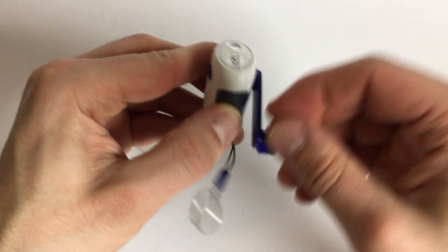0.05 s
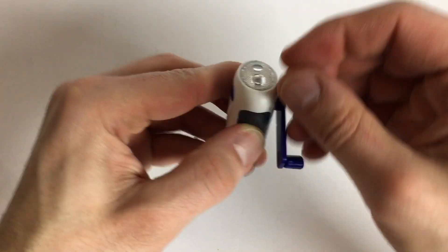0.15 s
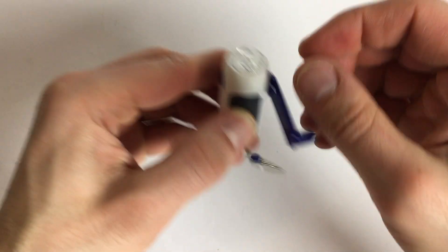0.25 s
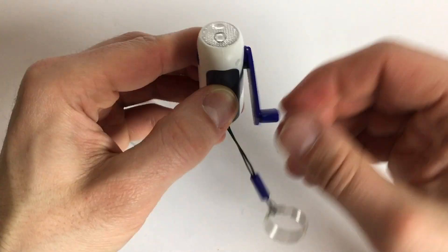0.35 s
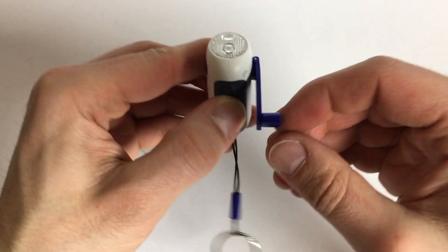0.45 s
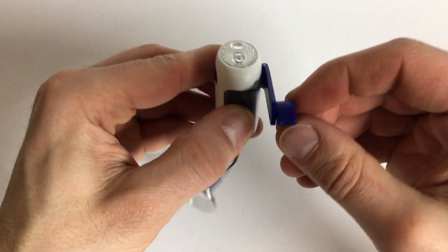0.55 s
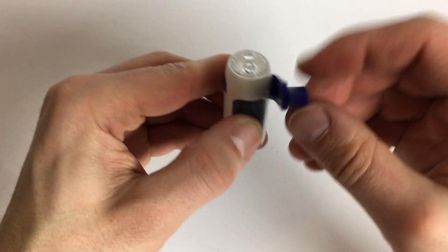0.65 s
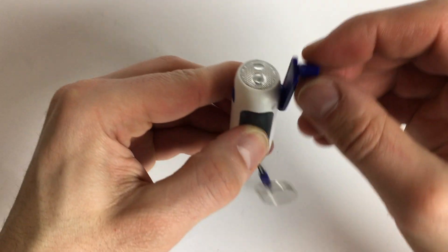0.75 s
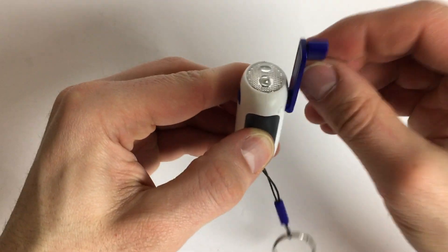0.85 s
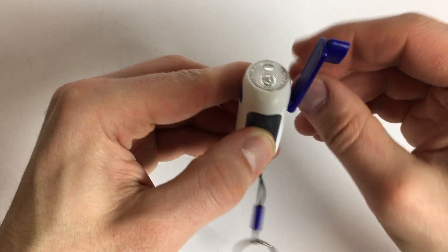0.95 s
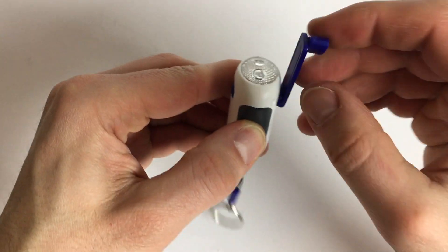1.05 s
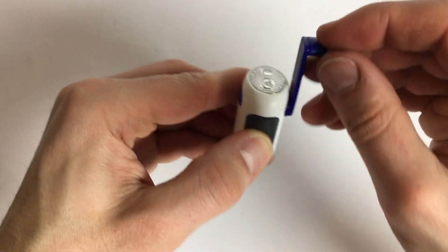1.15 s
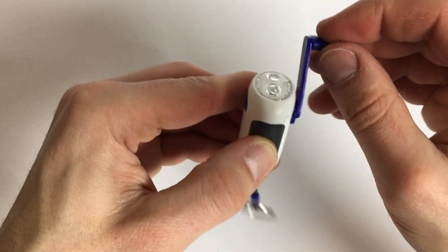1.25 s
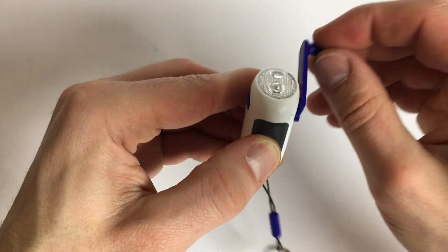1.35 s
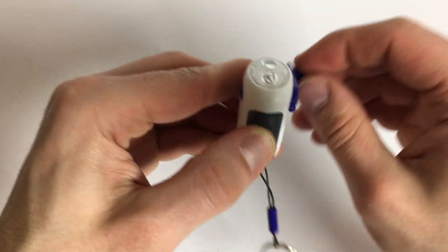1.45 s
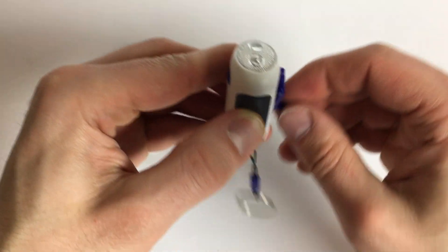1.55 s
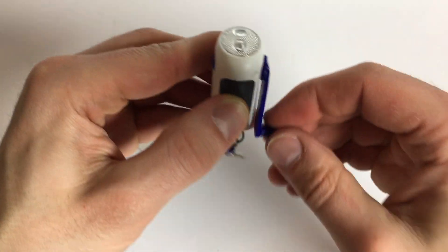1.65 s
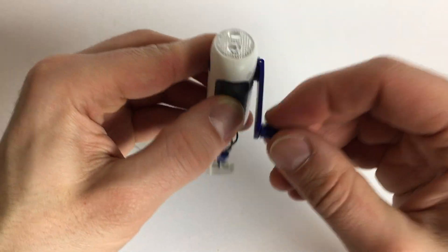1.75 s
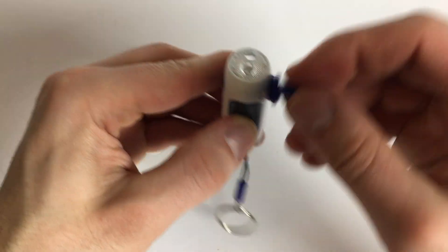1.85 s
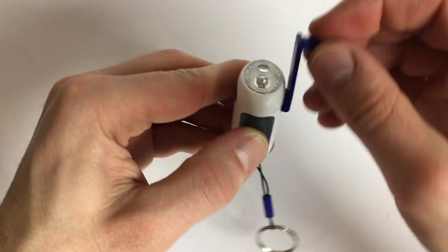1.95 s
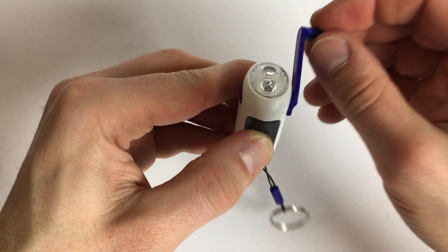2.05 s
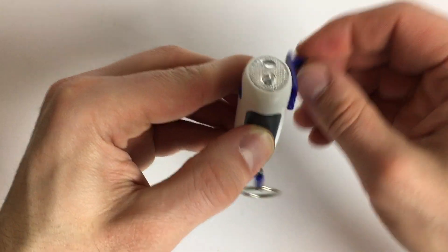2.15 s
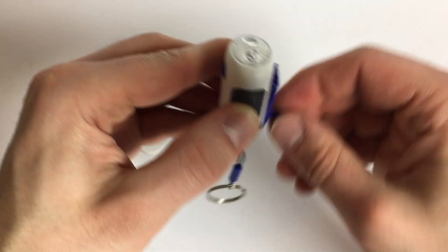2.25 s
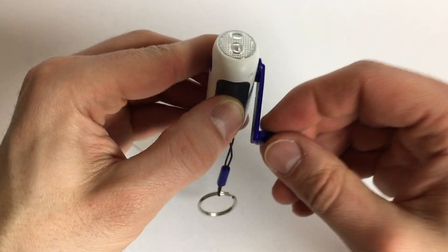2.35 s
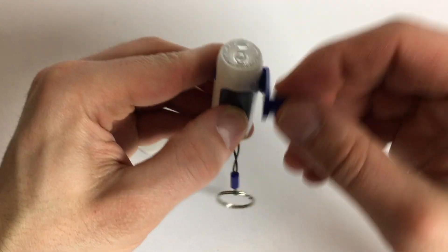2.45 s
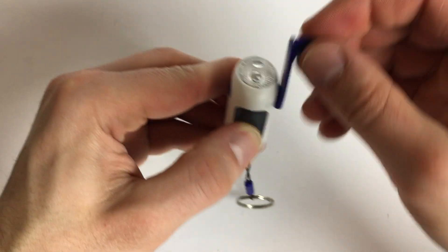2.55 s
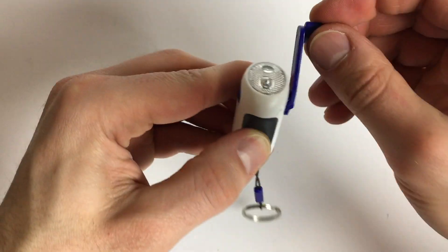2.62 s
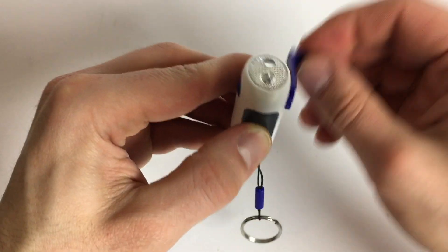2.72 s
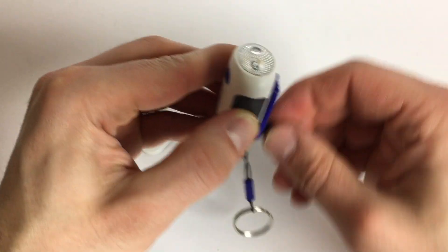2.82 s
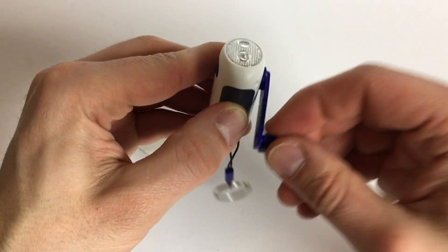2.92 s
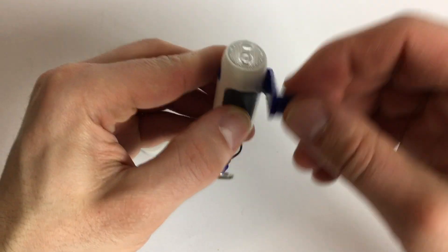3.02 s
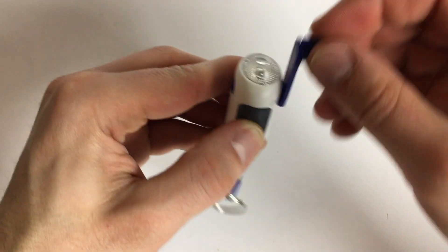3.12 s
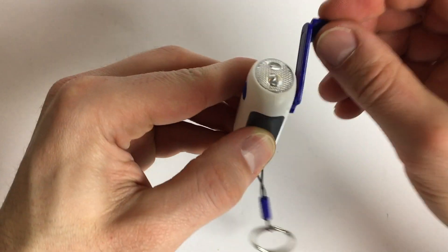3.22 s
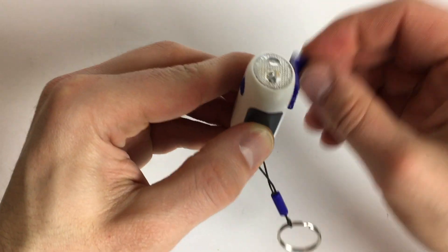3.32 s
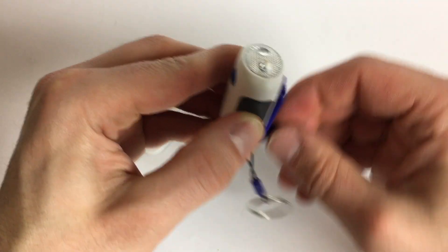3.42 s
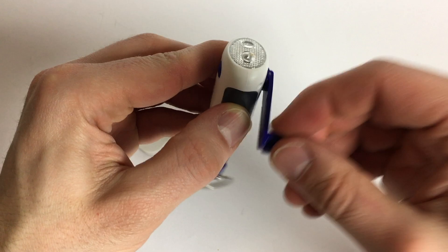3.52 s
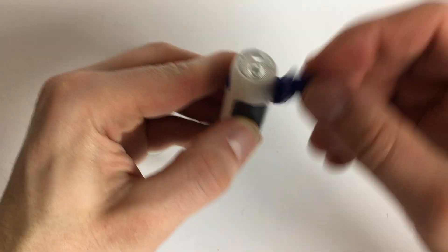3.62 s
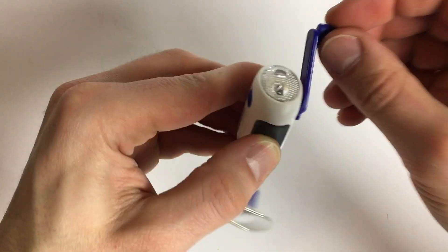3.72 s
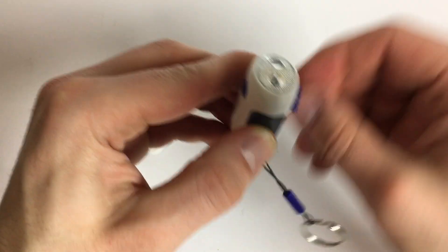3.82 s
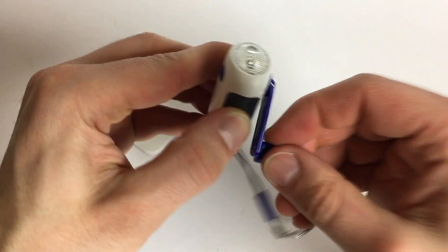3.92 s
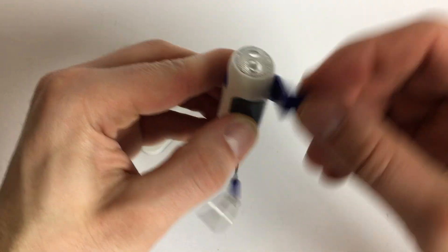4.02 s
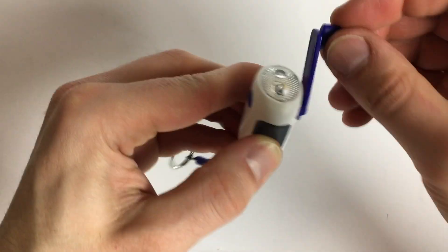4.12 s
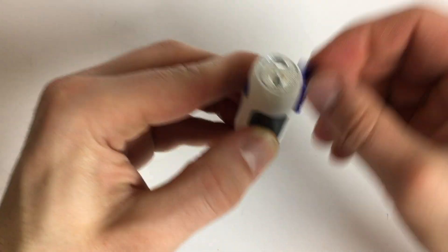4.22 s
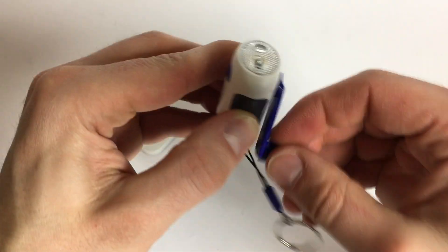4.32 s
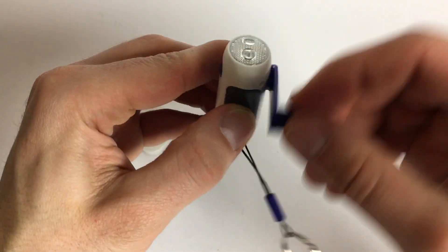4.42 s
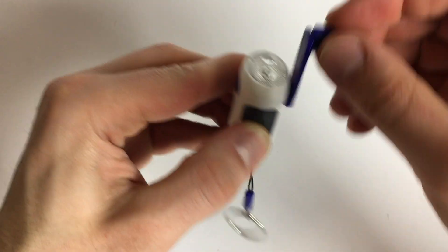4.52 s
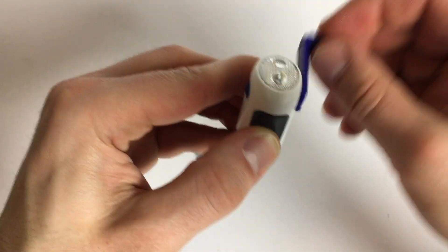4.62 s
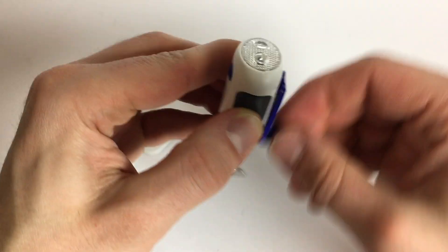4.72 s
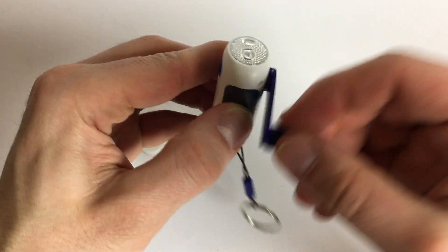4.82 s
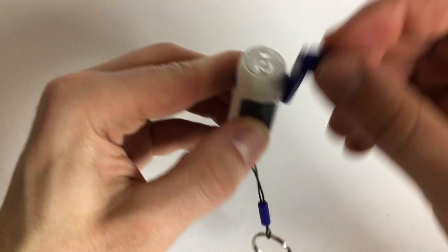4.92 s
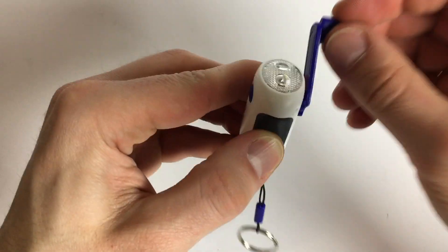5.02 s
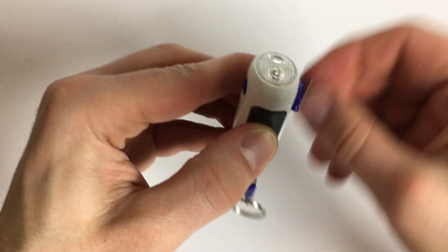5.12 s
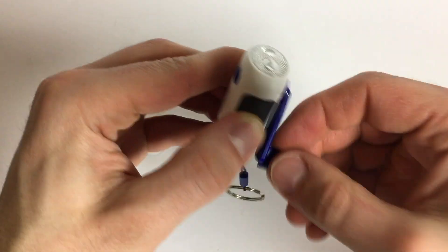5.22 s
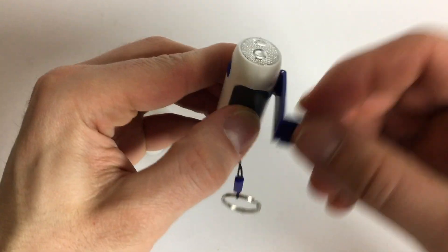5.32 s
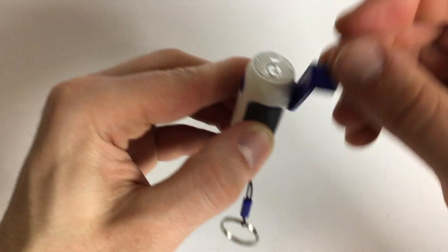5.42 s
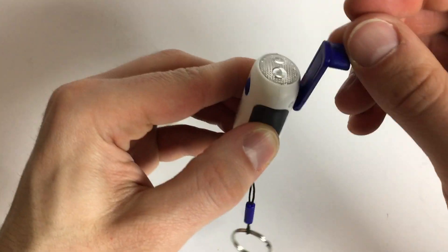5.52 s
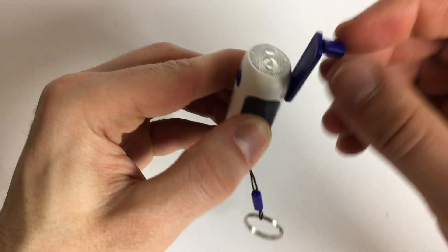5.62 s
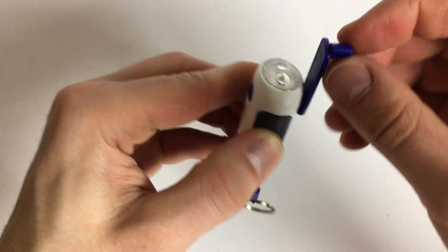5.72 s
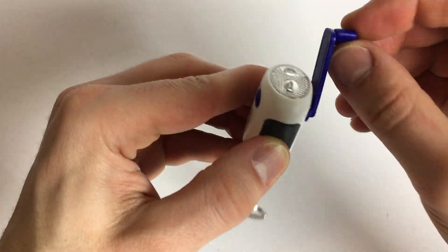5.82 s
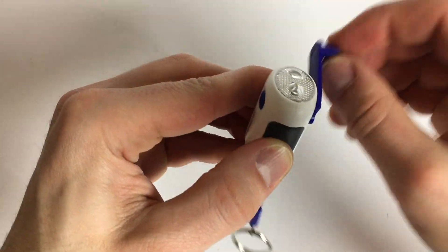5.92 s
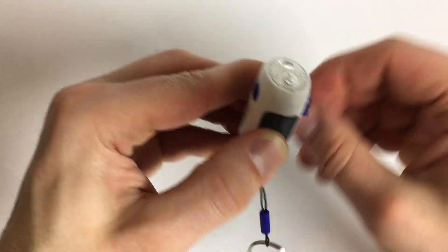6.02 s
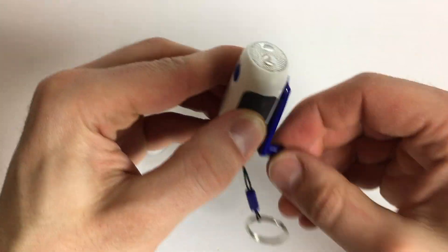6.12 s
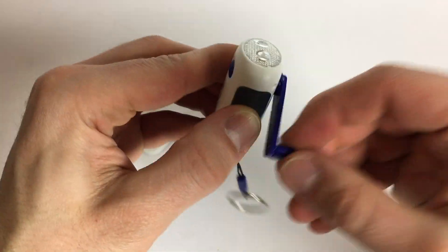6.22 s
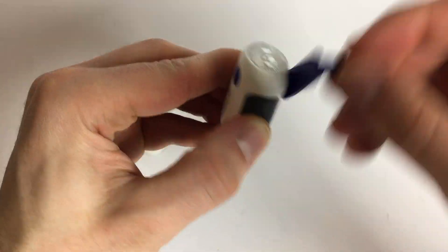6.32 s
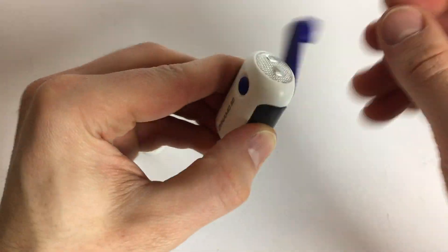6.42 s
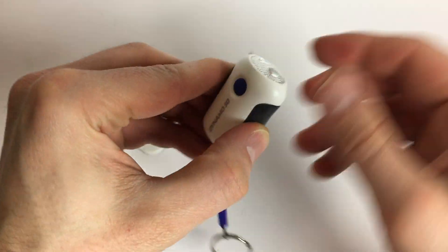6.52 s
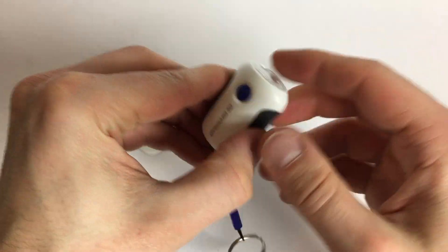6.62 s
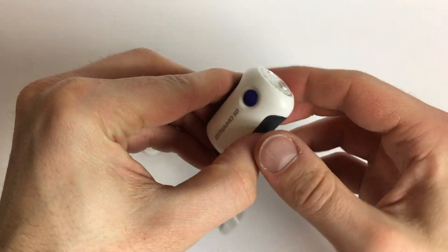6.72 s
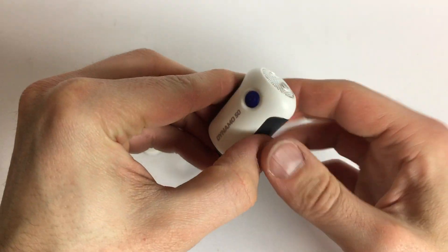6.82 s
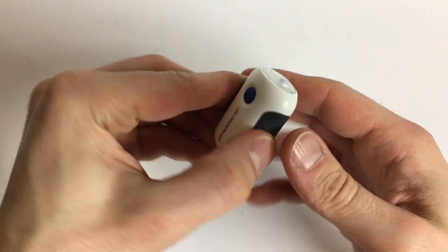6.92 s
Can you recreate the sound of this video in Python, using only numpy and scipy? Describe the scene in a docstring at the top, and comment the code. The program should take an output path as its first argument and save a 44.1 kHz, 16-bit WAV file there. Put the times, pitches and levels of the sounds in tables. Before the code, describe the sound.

Coarse plastic gear teeth clack rapidly over a rough grinding whir, with a buzzy pinion whine wavering in pitch as the crank is pushed round. The start is halting, the middle steady and vigorous, the end broken up. Sharp knocks of handle and key ring on the hollow shell stand out. The microphone is close; soft room murmur and faint rumble lie behind.

```python
"""A quiet room, the microphone close to a small plastic dynamo torch that a hand cranks in jerky strokes.
Coarse gear teeth clack in quick uneven bursts over a grind: noise blows and beating noise through the shell.
The pinion whines at its mesh rate, as sines at whole and half multiples, while it is loaded.
Single loud ticks, slow gear teeth at the start and handle and key ring on the shell, are short noise rattles;
narrow noise makes the ring shiver faintly. Behind lie room murmur, hiss, rumble, hum and two thin far tones."""
import sys
import numpy as np
from scipy import signal
from scipy.fft import rfft, irfft, next_fast_len
from scipy.io import wavfile
from scipy.ndimage import uniform_filter1d, map_coordinates

SR = 44100
rng = np.random.default_rng(int(sys.argv[2]) if len(sys.argv) > 2 else 0)


def materialize(psi):
    """Save the field psi as 16-bit PCM at rate SR to the path in sys.argv[1].

    A 1-D psi becomes a single channel; in a 2-D psi each row is a channel.
    """
    bounded = np.clip(np.atleast_2d(psi).T, -1, 1)
    quanta = np.round(bounded * 32767).astype(np.int16)
    wavfile.write(sys.argv[1], SR, quanta)


def volts(x):
    """Linear amplitude factor 10**(x/20) for a level x in dB, scalar or array-like."""
    e = np.asarray(x, float) / 20
    return 10 ** e


N = 306936

# room murmur and microphone hiss, relative spectrum: pitch_hz, level_db
AIR_COLOUR = [(15, -46), (25, -4), (97, -4), (141, -2), (293, -4), (463, -8), (531, -5.5), (677, -7),
              (775, -5), (962, -10), (1040, -10), (1440, -11.5), (16000, -12.5)]
# course of murmur and hiss before a slow random drift: time_s, level_db
AIR_LEVEL = [(0, -47), (.3, -51.5), (.5, -50), (1.65, -48), (2.44, -47), (3.3, -50.5), (4.27, -49),
             (4.8, -53), (5.1, -49.5), (5.6, -56), (6.22, -53), (6.96, -53.5)]
# swells of deep rumble: centre_s, half_length_s, level_db
RUMBLE_SWELLS = [(.09, .1, -60), (.42, .1, -66), (1.15, 0.53, -63.5), (4.5, 0.24, -72), (5.094, .1, -59),
                 (6.495, 0.11, -78)]
# swells of a faint hum: centre_s, half_length_s, level_db
HUM_SWELLS = [(0.517, 0.33, -56.5), (1.673, .12, -59), (2.48, 0.23, -61), (3.53, 0.18, -64),
              (4.5, 0.19, -77), (5.104, 0.21, -60.5), (6.238, 0.18, -62), (6.559, 0.074, -63)]
# two faint thin tones far off, before their flutter: centre_s, half_length_s, pitch_hz, level_db
FAR_TONES = [(.45, 0.12, 1220, -54), (6.519, 0.048, 1110, -58)]
# how hard the gears work, one table a stroke: time_s, clatter_db
EFFORT_STROKES = [
    [(0.0, -42), (0.028, -42), (0.044, -31.5), (0.09, -43), (0.11, -30), (0.122, -38.5), (0.22, -67)],
    [(0.32, -68), (0.338, -61), (0.368, -49), (0.38, -57), (0.468, -64), (0.51, -32), (0.524, -43),
     (0.564, -29), (0.6, -50)],
    [(0.6, -42.5), (0.69, -28.5), (0.728, -31), (0.764, -39), (0.77, -35)],
    [(0.77, -35), (0.82, -28.5), (0.888, -51), (0.898, -36), (0.906, -50), (0.924, -41), (0.934, -58),
     (0.96, -60)],
    [(1.18, -52), (1.182, -68), (1.218, -26.5), (1.244, -27.5), (1.296, -37), (1.342, -26), (1.486, -30),
     (1.586, -23.5), (1.62, -32.5)],
    [(1.62, -29), (1.626, -34.5), (1.648, -24.5), (1.678, -22), (1.826, -29.5), (1.93, -27.5),
     (1.942, -30.5), (2.032, -25), (2.08, -34)],
    [(2.08, -31.5), (2.138, -25), (2.282, -24.5), (2.344, -30.5), (2.354, -38), (2.384, -28.5),
     (2.392, -31), (2.48, -25.5), (2.56, -33.5)],
    [(2.56, -35), (2.568, -34), (2.622, -24.5), (2.656, -28), (2.75, -21), (2.792, -26), (2.812, -36.5),
     (2.866, -35), (2.88, -38)],
    [(2.88, -44), (2.912, -29), (2.97, -31.5), (3.02, -27.5), (3.098, -30.5), (3.252, -28), (3.386, -23),
     (3.434, -30), (3.44, -44)],
    [(3.44, -40), (3.478, -20.5), (3.552, -36), (3.608, -25.5), (3.666, -25.5), (3.738, -29.5),
     (3.87, -21.5), (3.884, -29), (3.96, -39)],
    [(3.96, -46.5), (4.024, -24.5), (4.102, -25), (4.154, -33), (4.24, -22), (4.284, -23.5), (4.344, -36),
     (4.358, -25.5), (4.4, -49.5)],
    [(4.4, -44), (4.43, -25), (4.514, -25.5), (4.552, -33), (4.678, -22), (4.726, -27.5), (4.748, -35.5),
     (4.804, -31.5), (4.83, -48)],
    [(4.83, -44.5), (4.906, -23), (4.95, -26.5), (5.0, -40), (5.008, -30.5), (5.154, -21.5), (5.212, -38),
     (5.224, -32.5), (5.27, -39.5)],
    [(5.27, -48), (5.284, -43), (5.302, -32.5), (5.404, -30), (5.448, -33), (5.492, -50), (5.512, -37),
     (5.554, -65), (5.6, -58)],
    [(5.76, -68), (5.774, -43), (5.788, -31.5), (5.828, -28.5), (5.848, -34), (5.902, -27.5), (5.95, -38.5)],
    [(5.95, -35), (5.996, -27), (6.086, -36), (6.106, -27.5), (6.138, -31), (6.166, -42), (6.18, -34)],
    [(6.18, -40), (6.188, -47), (6.212, -29), (6.23, -30), (6.278, -24), (6.314, -26.5), (6.368, -41),
     (6.39, -37.5)],
    [(6.39, -44), (6.4, -44), (6.46, -36.5), (6.474, -46), (6.486, -39.5), (6.508, -52), (6.532, -44.5),
     (6.554, -56), (6.62, -64.5)],
]
# pinion under load, one table a stroke, before smoothing and jitter: time_s, mesh_hz
MESH_STROKES = [
    [(.53, 1272), (.554, 1276), (.572, 1417), (.6, 1334)],
    [(.65, 1291), (.664, 1350), (.686, 1662), (.724, 1753), (.77, 1695)],
    [(.78, 1422), (.798, 1430), (.814, 1543), (.86, 1702)],
    [(1.2, 1349), (1.214, 1635), (1.238, 1904), (1.28, 2020)],
    [(1.31, 1596), (1.324, 1593), (1.362, 2138), (1.38, 2150)],
    [(1.53, 1134), (1.576, 1291), (1.61, 1224)],
    [(1.66, 1144), (1.698, 1346), (1.774, 1579), (1.848, 1548), (1.89, 1404), (1.928, 1480), (1.976, 1310),
     (2.08, 1338)],
    [(2.12, 1213), (2.176, 1559), (2.208, 1640), (2.27, 1772), (2.29, 1916)],
    [(2.42, 1340), (2.452, 1481), (2.498, 1807), (2.52, 1814)],
    [(2.56, 1650), (2.6, 1553), (2.702, 1752), (2.722, 1856), (2.764, 2233), (2.82, 2310)],
    [(3.0, 1229), (3.036, 1463), (3.06, 1640), (3.124, 1463), (3.16, 1558), (3.278, 1542), (3.348, 1739),
     (3.398, 1982), (3.43, 1942)],
    [(3.57, 1558), (3.598, 1649), (3.668, 2333), (3.702, 2445), (3.782, 2216), (3.87, 2602)],
    [(3.99, 1476), (4.012, 1555), (4.092, 2478), (4.118, 2608), (4.204, 2168), (4.234, 2299), (4.31, 3095)],
    [(4.42, 1134), (4.472, 2002), (4.524, 2454), (4.606, 2147), (4.636, 2127), (4.716, 2872), (4.73, 2890)],
    [(4.87, 1315), (4.918, 2057), (4.962, 2245), (5.034, 1851), (5.078, 1916), (5.142, 2357), (5.16, 2323)],
    [(5.215, 2110), (5.255, 1912)],
    [(5.29, 1220), (5.322, 1324), (5.412, 1423), (5.45, 1407)],
    [(5.78, 1475), (5.804, 1967), (5.828, 2423), (5.85, 2423)],
    [(5.87, 1271), (5.896, 1338), (5.92, 1462)],
    [(5.97, 1275), (6.002, 1544), (6.02, 1736), (6.04, 1796), (6.088, 1638), (6.15, 1812)],
    [(6.2, 1266), (6.216, 1395), (6.248, 1727), (6.3, 2760), (6.34, 2952)],
]
# the treble flares, mostly as a fast stroke ends: centre_s, half_length_s, lift_db
TREBLE_FLARES = [(.57, .03, 4), (0.73, 0.025, 3), (.81, .03, 0.5), (1.223, 0.026, 1), (1.551, 0.041, 4),
                 (2.794, 0.026, 3.5), (3.429, 0.026, 6), (3.668, 0.034, 3), (3.88, .025, 1), (4.3, .03, 0),
                 (4.719, .025, 0), (5.161, 0.025, 0.5), (6.11, 0.031, 3.5), (6.309, 0.024, 2)]
# broad colour of shell and microphone: pitch_hz, gain_db
SHELL_COLOUR = [(500, -27.5), (900, -26.5), (1500, -15), (2800, -15), (3500, -4), (5000, 1), (7500, -7.5),
                (9700, -6), (13500, 2), (15000, 11.5), (16000, -5.5)]
# shell resonances as the hands shade them:
# pitch_hz, width_hz, handle_near_db, handle_away_db, first_grip_db
SHELL_RINGS = [(2150, 940, 15, 15, 17.5), (3450, 750, 7.5, 4, 2), (4050, 110, -3.8, 9.5, 3),
               (4390, 150, 2.5, -5.5, 11.5), (4743, 450, 4, 6, -6), (5560, 250, -6, 1.8, -5),
               (5900, 350, 2, 9.5, -1), (6380, 275, 6.5, 7, -2), (6930, 320, 4.5, 5, -6),
               (7400, 210, 2, 1, -1), (8420, 380, 9, -1.5, -3.5), (10170, 460, 0.5, 4.5, -2),
               (10790, 240, 9, -1, 11), (12150, 720, 10.5, 4, 9), (13600, 600, 9, 7, 7),
               (15500, 1200, 1, 8, 4.5)]
# the handle swings past the microphone's side once a turn: time_s
HANDLE_NEAREST = [0.03, .62, 1.16, 1.85, 2.45, 3.03, 3.62, 4.02, 4.5, 4.89, 5.38, 6.3, 6.9]
# how long the room rings: pitch_hz, t60_s
ROOM_DECAY = [(1000, 0.37), (4000, 0.15), (15000, 0.043)]
# single loud ticks: slow gear teeth at the start, knocks of handle and key ring on the shell;
# before the band trims in ticks(): start_s, level_db, treble_db (re level), dull_db (re level)
LOUD_TICKS = [(0.0413, -29, -7, -22), (0.047, -28, -6, -19), (0.055, -23, -10, -20), (0.06, -21, -9, -20),
              (0.0637, -17, -10, -27), (0.0676, -13.5, -8, -21), (0.0944, -23, -5, -21),
              (0.1036, -14, 12, -28), (0.1097, -19.5, 8, -33), (0.3424, -23, 4, -17), (0.3476, -34, 9, -22),
              (0.3652, -17.5, 3, -14), (0.4018, -30, -14, -18), (0.448, -31, -12, -20),
              (0.4713, -33, -3, -10), (0.8949, -25, -15, -18.5), (0.9156, -32, -8, 1),
              (0.9227, -16.5, -6, -6.5), (0.9953, -42, -5, 6), (1.042, -17.5, 11.5, -30),
              (1.055, -27, -20, -4), (1.1478, -30, 10.5, -4), (1.1743, -27, -24, -3.5),
              (1.4291, -13, 10, -10), (1.4634, -11, -1, -22), (2.9135, -14, -11, -33),
              (3.4519, -21, -7, -25), (4.8422, -15, -5, -23), (4.8666, -17, 6, -25),
              (5.5058, -21.5, -13, -5), (5.632, -36, -20, 1.5), (5.7467, -33.5, -7, -9),
              (6.0042, -14, 6, -22), (6.0471, -16, 3, -17), (6.0683, -14, 7.5, -21), (6.1005, -15, 5, -16),
              (6.4553, -33, -9, -14), (6.481, -24, -8, -8), (6.6427, -23, 13.5, -5), (6.7162, -26, 1, -11),
              (6.775, -30, 10.5, -26), (6.84, -29.5, 3, -27), (6.861, -41, -15, 4), (6.8739, -29, -20, -22),
              (6.9257, -33, 0, -11)]
# the dangling steel ring's shiver: pitch_hz, width_hz, level_db (re the tick's listed treble), t60_s
RING_SHIVER = [(7100, 600, -39, .2), (13800, 900, -31, .19)]
# each stroke's grip on the pinion, before speed and flutter: tooth_load_db, half_order_buzz_db
PINION_LOADS = [(1, -3), (0, 0), (2, 2), (2, 1), (1, 0), (-4, -8), (1, -7), (0, -9), (1, -6), (3, -4),
                (1, -1), (0, -8), (-2, -9), (-2, -9), (-1, -8), (2, -4), (-3, -9), (2, -1), (0, 0),
                (-2, -1), (-1, -4)]
# the mesh tone and its overtones: multiple, level_db
MESH_ORDERS = [(1, 0), (2, -7), (3, -12)]
# the buzz, before its flutter: multiple, level_db
BUZZ_ORDERS = [(.5, -3), (1.5, 0), (2.5, -1), (3, -2), (3.5, -2), (4, -3), (4.5, -4)]
# how well the shell sends out a mesh tone: pitch_hz, level_db (re clatter)
SHELL_SINGS = [(600, -36), (1300, -25), (1600, -19), (2100, -12), (2500, -12), (2900, -15), (3500, -9),
               (5000, -10), (9000, -22)]


def seconds():
    """Time of every sample."""
    return np.arange(N) / SR


def unit(x):
    """Scaled to rms 1."""
    return x / np.sqrt(np.mean(x ** 2) + 1e-20)


def along(points, hz):
    """(Hz, value) points read on a log axis."""
    f, v = np.transpose(points)
    return np.interp(np.log(hz + 1), np.log(f + 1), v)


def curves(rows, outside=None):
    """One value per sample for each column after the time."""
    s, *cols = np.transpose(rows)
    return np.array([np.interp(seconds(), s, c, outside, outside) for c in cols])


def wobble(rate):
    """A smooth random curve, rate knots a second."""
    knots = rng.standard_normal(int(N * rate / SR) + 4)
    return map_coordinates(knots, [np.arange(N) * rate / SR])


def swell(s, half_s):
    """A smooth rise and fall around a moment."""
    return np.exp(-2 * ((seconds() - s) / half_s) ** 2)


def swells(rows):
    """Summed amplitude of swells given by centre, half length and dB."""
    return sum(volts(db) * swell(s, half_s) for s, half_s, db in rows)


def band(lo_hz, hi_hz):
    """Narrow noise of rms 1."""
    sos = signal.butter(2, [lo_hz, hi_hz], "band", fs=SR, output="sos")
    return unit(signal.sosfilt(sos, rng.standard_normal(N)))


def filtered(x, gain_db):
    """x through the causal minimum-phase filter with this gain over frequency."""
    m = next_fast_len(N + 8192)
    gain = volts(gain_db(np.fft.rfftfreq(m, 1 / SR)))
    cepstrum = irfft(np.log(gain + 1e-6), m)
    # fold the cepstrum onto positive time
    cepstrum[..., 1:m // 2] *= 2
    cepstrum[..., m // 2 + 1:] = 0
    return irfft(rfft(x, m) * np.exp(rfft(cepstrum)), m)[..., :N]


def dying(x, t60):
    """Every spike of x trails off exponentially, 60 dB in t60 seconds."""
    keep = volts(-60 / (t60 * SR))
    return signal.lfilter([1], [1, -keep], x)


def air():
    """Shaped noise for murmur and hiss, narrow noise for rumble and hum, wavering sines for the far tones."""
    noise = filtered(rng.standard_normal(N), lambda hz: along(AIR_COLOUR, hz))
    murmur = unit(noise) * volts(curves(AIR_LEVEL)[0] + 1.1 * wobble(5))
    # rumble and hum at rest, plus their swells
    rumble = volts(-71.5) + swells(RUMBLE_SWELLS)
    hum = volts(-74.5) + swells(HUM_SWELLS)
    thin = np.zeros(N)
    for s, half_s, hz, db in FAR_TONES:
        level = volts(db + 1.7 * wobble(33)) * swell(s, half_s)
        thin += level * np.sin(2 * np.pi * hz * seconds() + 2.4 * wobble(30))
    return murmur + rumble * band(60, 75) + hum * band(362, 428) + thin


def mesh_hz():
    """Pinion meshes a second: driven in the strokes, coasting in the longer pauses."""
    slack_hz, slack_s = 754, .05  # coasting rate, reached this long after a stroke and left this long before
    starts = [stroke[0][0] for stroke in MESH_STROKES]
    ends = [stroke[-1][0] for stroke in MESH_STROKES]
    gaps = zip([-1] + ends, starts + [N / SR + 1])
    pauses = [(a, b) for a, b in gaps if b - a > 2 * slack_s]
    coasting = [(s, slack_hz) for a, b in pauses for s in (a + slack_s, b - slack_s)]
    driven = [tuple(row) for stroke in MESH_STROKES for row in stroke]
    hz = curves(sorted(driven + coasting))[0]
    return uniform_filter1d(hz, 350) * (1 + .006 * wobble(60))


def effort(hz):
    """Gains of clatter, treble and hollow low part; harder and faster work sounds brighter."""
    full_db = -25  # clatter of a firm stroke
    clatter_db = np.max([curves(stroke, -120)[0] for stroke in EFFORT_STROKES], axis=0)
    firm_db = np.clip(clatter_db - full_db, -25, 10)
    # treble and hollow part are relative to the clatter; treble gains 1.5 dB an octave of speed
    treble_db = 0.5 + 0.28 * firm_db + 1.5 * np.log2(hz / 1500)
    treble_db += sum(db * swell(s, half_s) for s, half_s, db in TREBLE_FLARES)
    hollow_db = -13 - 0.18 * firm_db
    return volts(clatter_db + np.array([0 * firm_db, treble_db, hollow_db]))


def shell_parts(force):
    """The shell's answer to a force, coloured by where the hands are: middle, treble and hollow low part."""
    def colour_db(hz):
        lift = sum(np.outer(db, 1 / (1 + (2 * (hz - c) / width) ** 2)) for c, width, *db in SHELL_RINGS)
        return along(SHELL_COLOUR, hz) + lift

    def split(kind, edges_hz):
        return signal.sosfilt(signal.butter(4, edges_hz, kind, fs=SR, output="sos"), sound)

    near, away, first = filtered(force, colour_db)
    turn = np.interp(seconds(), HANDLE_NEAREST, np.arange(len(HANDLE_NEAREST)))
    nearness = np.clip(.5 + 0.42 * np.cos(2 * np.pi * turn), 0, 1)
    # the holding hand settles into its second grip soon after 1.388 s
    settled = np.clip((seconds() - 1.388) / 0.13, .25, 1)
    sound = settled * (nearness * near + (1 - nearness) * away) + (1 - settled) * first
    low = split("low", 2950)
    high = split("high", 9000)
    mid = split("band", [2950, 9000])
    return np.array([mid, high, low])


def gears(hz, turns):
    """Coarse teeth clack one by one at uneven strength over the grind of the pinion."""
    teeth_ratio = 3  # pinion meshes for each coarse tooth
    jitter, scatter_db = .06, 2.2  # of tooth spacing; of each blow
    clack_t60, rise_t60 = .005, .0015  # s
    due = np.flatnonzero(np.diff(np.floor(turns / teeth_ratio)))
    luck = rng.standard_normal((N // 20, 2))[:len(due)]
    at = np.clip(due + jitter * luck[:, 0] * np.gradient(due), 0, N - 1).astype(int)
    blows = np.bincount(at, volts(scatter_db * luck[:, 1]), N)
    blows = blows * volts(1.5 * wobble(45))  # tight teeth come in runs
    rattle = dying(dying(blows, clack_t60), rise_t60) * rng.standard_normal(N)
    clack = unit(rattle) + volts(-9) * unit(blows)  # a dry snap on each blow
    beating = 1 + 0.97 * np.cos(2 * np.pi * turns)
    grind = beating * volts(0.94 * wobble(37)) * rng.standard_normal(N)
    force = clack + volts(-6) * unit(grind * np.gradient(turns) ** 0.08)  # the grind grows with speed
    # steady strength; the effort sets the level
    force /= np.sqrt(np.abs(uniform_filter1d(force ** 2, 2600))) + 0.0061
    parts = [part / np.sqrt(uniform_filter1d(part ** 2, 9000) + 1e-12) for part in shell_parts(force)]
    return (effort(hz) * parts).sum(0)


def room(x):
    """Each frequency of the walls' answer dies at its own speed."""
    hz, t, z = signal.stft(rng.standard_normal(SR // 2), SR, nperseg=256)
    fade = volts(-60 * t / along(ROOM_DECAY, hz)[:, None])
    tail = signal.istft(z * fade, SR, nperseg=256)[1]
    late = np.pad(x, (300, 0))  # delay in samples
    return signal.fftconvolve(late, tail / np.linalg.norm(tail))[:N]


def ticks():
    """Each loud tick is a short rattle of shell-coloured noise with a weaker rebound."""
    t60, rise_t60 = .007, .001  # s
    echo_s, echo_db = 0.004, -9
    s, peak_db, treble_db, dull_db = np.transpose(LOUD_TICKS)
    at = np.round(s * SR).astype(int)
    grains = shell_parts(rng.standard_normal(N))
    levels_db = [peak_db - 5.5, peak_db + treble_db - 7, peak_db + dull_db - 5.0]
    sound = np.zeros(N)
    for grain, db in zip(grains, levels_db):
        blows = np.bincount(at, volts(db), N)
        blows = blows + volts(echo_db) * np.roll(blows, round(echo_s * SR))
        envelope = (1 - volts(-60 / (rise_t60 * SR))) * dying(dying(blows, t60), rise_t60)
        sound += envelope * unit(grain)
    return sound


def key_ring():
    """The loud ticks, the bright ones most, leave a faint, blurred shiver of the steel ring."""
    s, peak_db, treble_db, _ = np.transpose(LOUD_TICKS)
    blows = np.bincount(np.round(s * SR).astype(int), volts(peak_db + treble_db), N)
    sound = np.zeros(N)
    for hz, width, db, t60 in RING_SHIVER:
        sound += volts(db) * dying(blows, t60) * band(hz - width / 2, hz + width / 2)
    return sound


def whine(hz, turns):
    """The loaded pinion's mesh tone, overtones and rough half-order stack sound through the shell."""
    t = seconds()
    load, buzz = np.zeros(N), np.zeros(N)
    for stroke, (load_db, buzz_db) in zip(MESH_STROKES, PINION_LOADS):
        start, end = stroke[0][0], stroke[-1][0]
        loaded = (t >= start) & (t < end)
        load += volts(load_db) * loaded
        # the buzz is strongest as a stroke bites, then fades 45 dB a second
        buzz += volts(buzz_db - 45 * np.abs(t - start)) * loaded
    # teeth press harder while the hand speeds up (1/s)
    speeding = np.clip(uniform_filter1d(np.gradient(np.log(hz)) * SR, 1300), 0, 7)
    # tooth load eases with speed, 6 dB an octave
    load = load * volts(-6 * np.log2(hz / 1500) + .8 * speeding + 2 * wobble(20))
    buzz = buzz * volts(.6 * speeding + 2 * wobble(25))

    def tone(k, slip=0):
        level = volts(along(SHELL_SINGS, k * hz) + 2 * wobble(50))
        return level * np.sin(2 * np.pi * k * turns + slip)

    orders = sum(volts(db) * tone(k) for k, db in MESH_ORDERS)
    slip = .13 * wobble(120)  # phase scatter of the lowest half order (rad), growing with order
    halves = sum(volts(db + 3.5 * wobble(45)) * tone(k, 2 * k * slip) for k, db in BUZZ_ORDERS)
    clatter = effort(hz)[0]
    return uniform_filter1d(load * clatter, 700) * orders + uniform_filter1d(buzz * clatter, 700) * halves


def scene():
    """The torch close by, a little room around it."""
    hz = mesh_hz()
    turns = np.cumsum(hz) / SR  # pinion meshes so far
    torch = gears(hz, turns) + whine(hz, turns) + ticks() + key_ring()
    return (torch + volts(-16.0) * room(torch) + air())[None]


def roll_off(x):
    """The treble ends steeply here."""
    return signal.sosfilt(signal.butter(12, 16820, fs=SR, output="sos"), x)


def record(dry):
    """A steep low-pass at 15780 Hz closes off the top of the finished mix."""
    lowpass = signal.ellip(10, .5, 45, 15780, fs=SR, output="sos")
    mix = signal.sosfilt(lowpass, dry)
    return roll_off(mix)


dry = scene()
out = record(dry)
materialize(out)
```